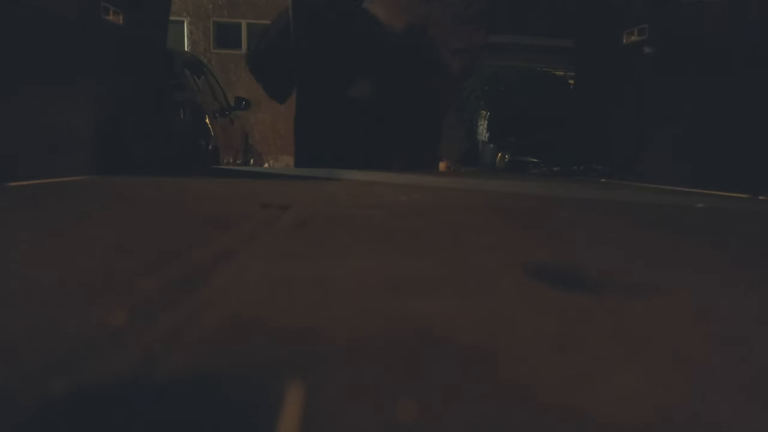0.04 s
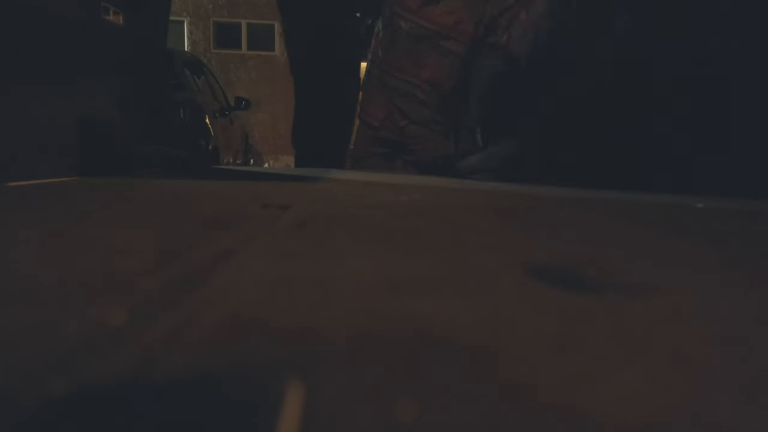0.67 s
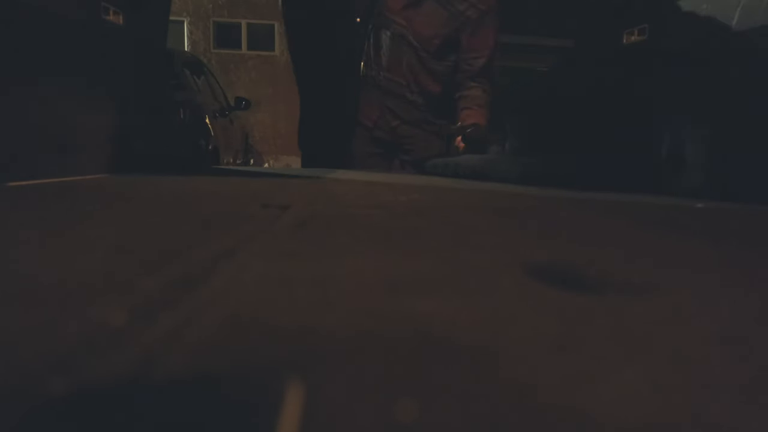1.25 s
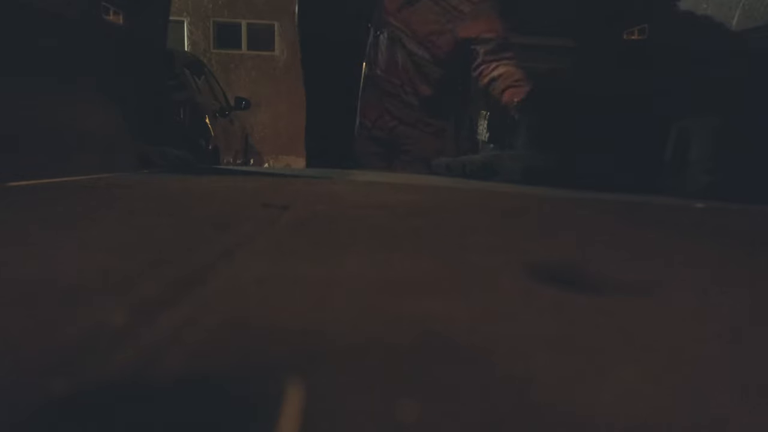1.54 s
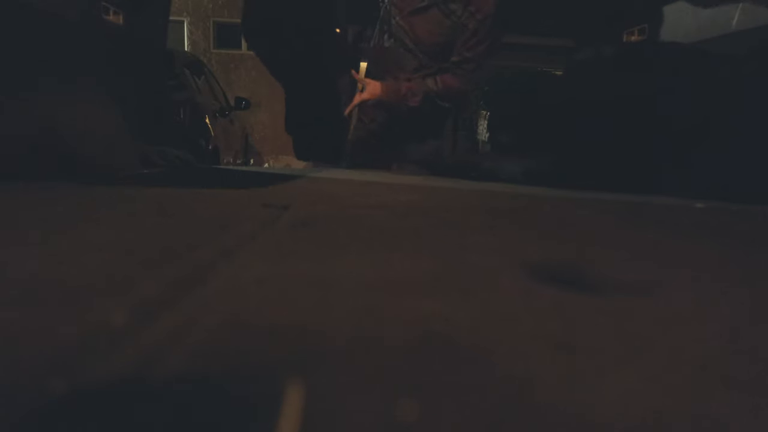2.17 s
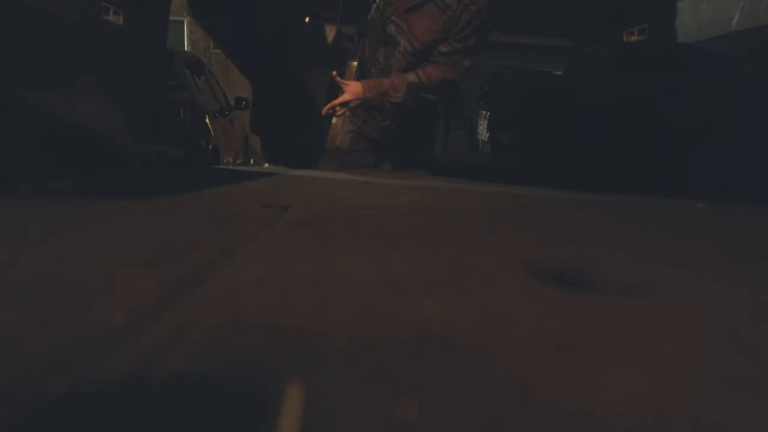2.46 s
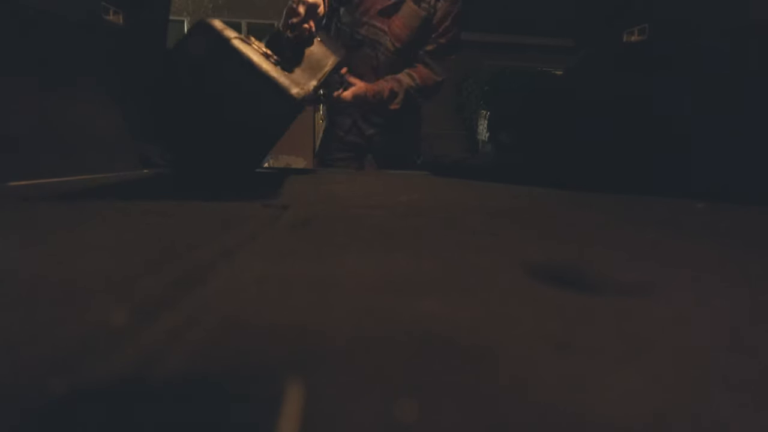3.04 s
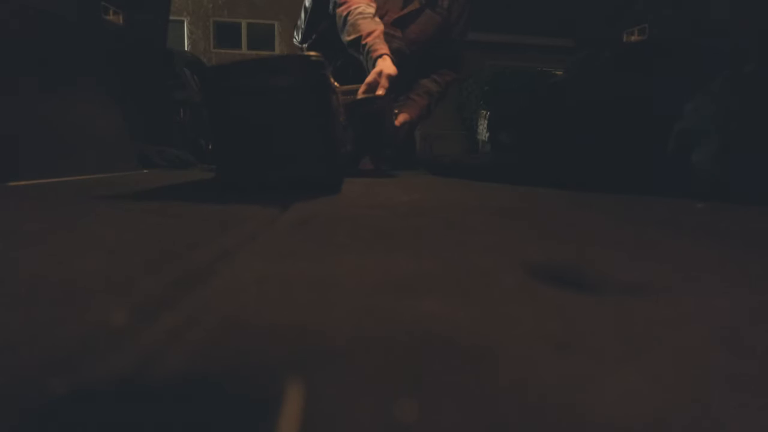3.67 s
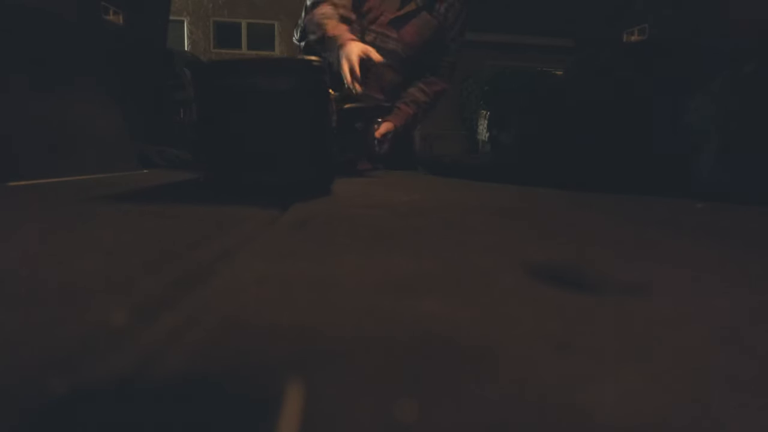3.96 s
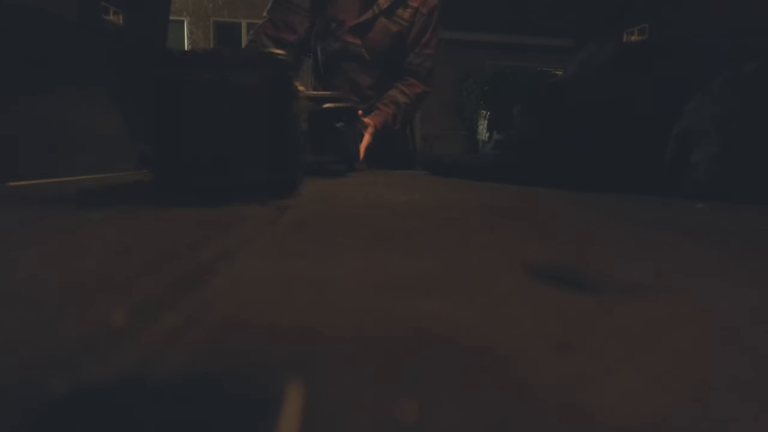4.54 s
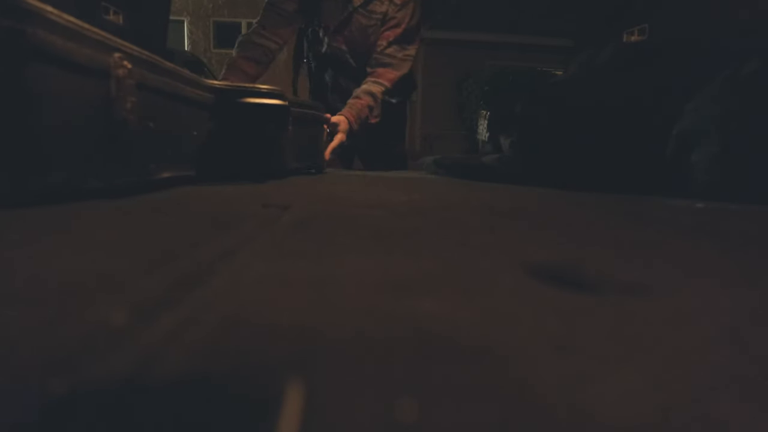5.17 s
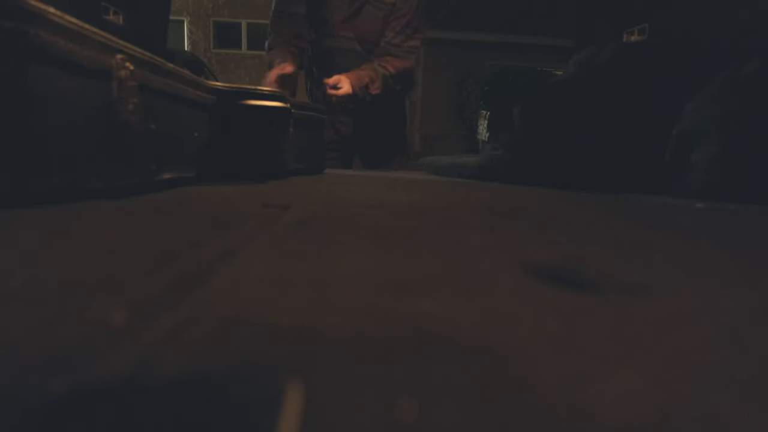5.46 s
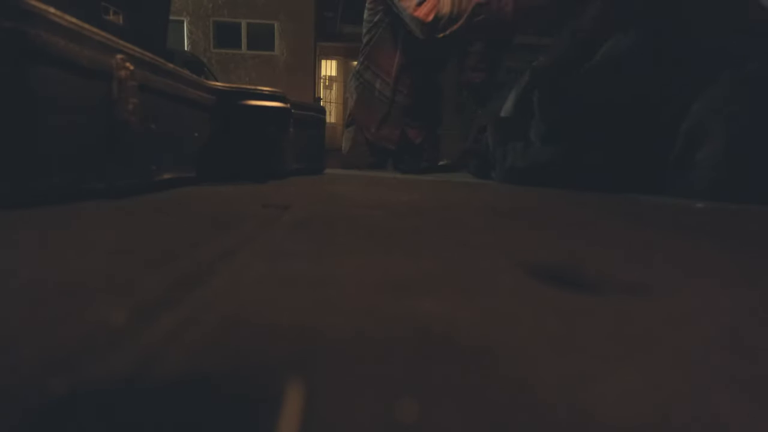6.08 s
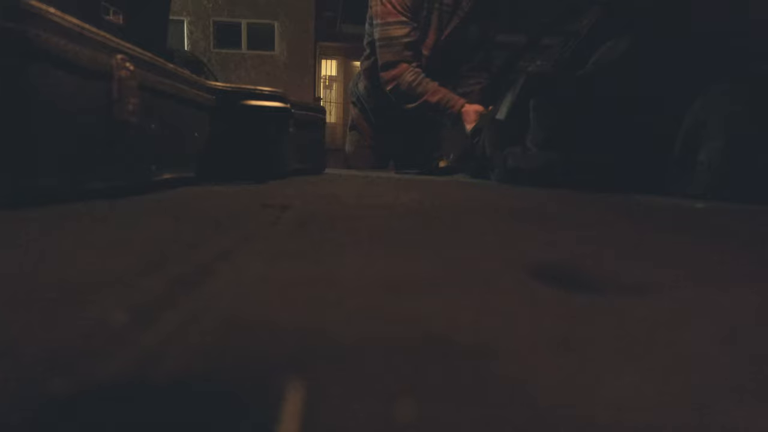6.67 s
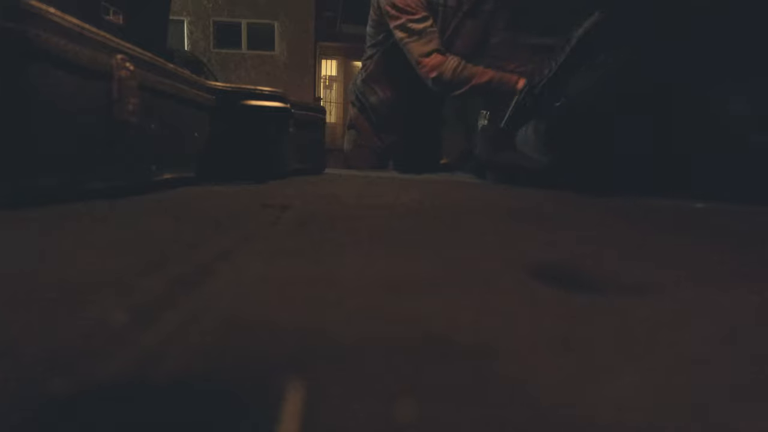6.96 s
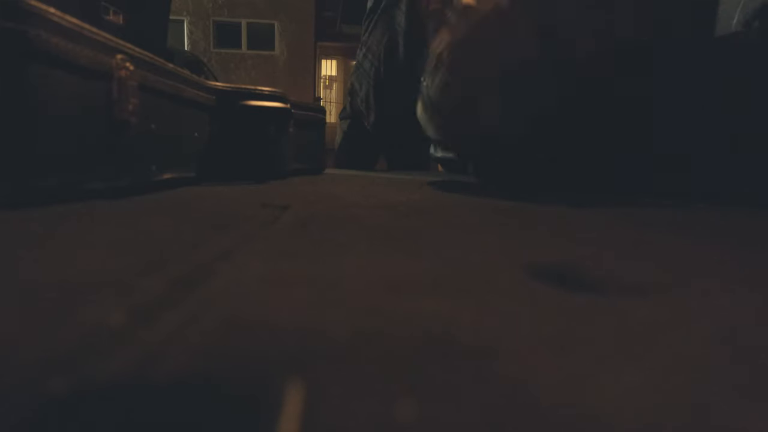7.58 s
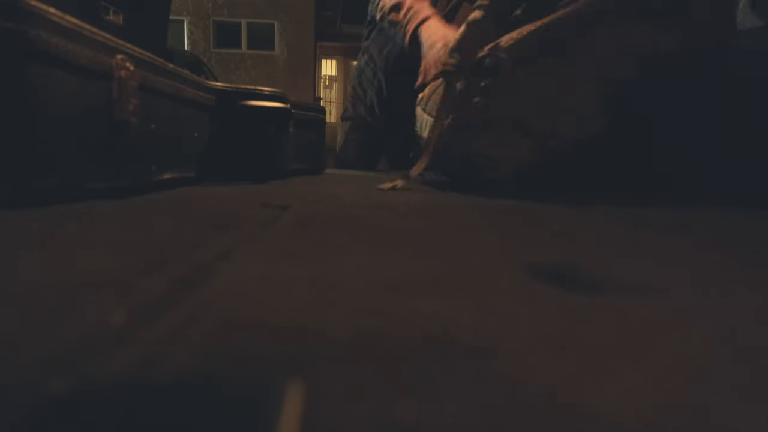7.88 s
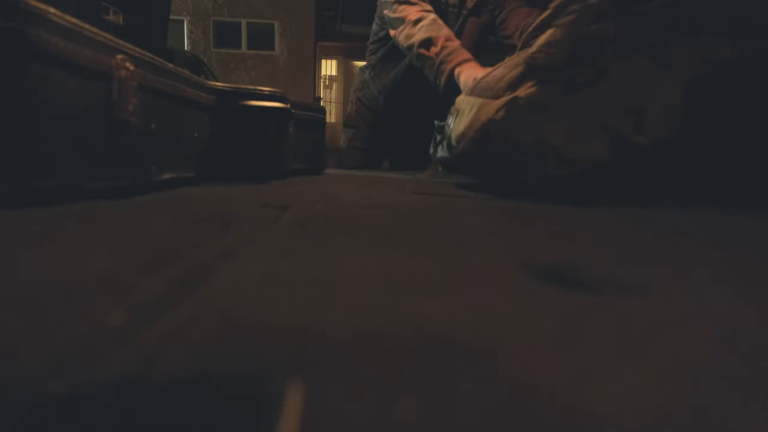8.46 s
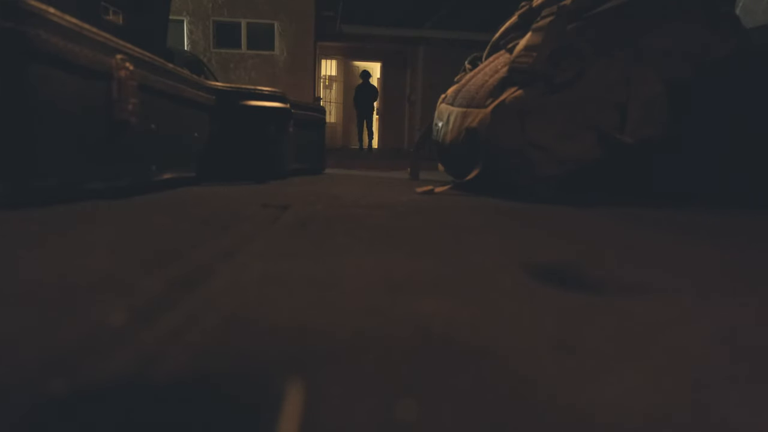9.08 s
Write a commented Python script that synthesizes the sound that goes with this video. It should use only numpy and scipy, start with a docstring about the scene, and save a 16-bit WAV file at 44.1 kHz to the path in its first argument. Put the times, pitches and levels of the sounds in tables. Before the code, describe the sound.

Fabric bags swish and scrape across a carpeted car floor while hard cases thump down, knock and rock to rest.

```python
"""Loading luggage into a car

Hard cases and fabric bags go onto the carpeted floor, heard from inside over a quiet hum.
Stick-slip friction makes nylon swish and drag. Impacts excite the damped modes of floor and shell
as a case thumps down, is pushed along and rocks to rest; straps and buckles tick.
The small padded cabin adds short reflections to the blows."""
import sys
import numpy as np
from scipy import signal
from scipy.fft import rfft, irfft, next_fast_len
from scipy.io import wavfile
from scipy.ndimage import uniform_filter1d, map_coordinates

SR = 44100
rng = np.random.default_rng(int(sys.argv[2]) if len(sys.argv) > 2 else 0)


def int16_out(signal):
    """Quantize to a 16-bit WAV file."""
    q = np.round(np.clip(np.atleast_2d(signal).T, -1, 1) * 32767)
    wavfile.write(sys.argv[1], SR, q.astype(np.int16))


N = 411011
TIME = np.arange(N) / SR
HZ = np.fft.rfftfreq(N, 1 / SR) + 1
AGE = np.arange(SR // 2) / SR  # t/s since an impact
EDGE_HZ = 15950


def amp(db):
    """Amplitude ratio: a factor of ten per 20 dB."""
    return 10 ** (np.asarray(db) / 20)


def decay(t60):
    """Exponential damping: 60 dB lost in t60 seconds."""
    return amp(-60 * AGE / t60)


def unit_rms(x):
    """Normalisation to unit mean power."""
    return x / np.sqrt(np.mean(x ** 2) + 1e-20)


def spectrum(points):
    """Gain at each of HZ, by interpolation of level against log frequency."""
    f, db = np.transpose(points)
    return amp(np.interp(np.log(HZ), np.log(f + 1), db))


def colour(x, gain):
    """Zero-phase filtering: multiplication in the frequency domain."""
    count = x.shape[-1]
    size = next_fast_len(count)
    gain = np.interp(np.fft.rfftfreq(size), np.fft.rfftfreq(count), gain)
    return irfft(rfft(x, size) * gain, size)[..., :count]


def band(x, hz, octaves):
    """Band-pass filtering by a Gaussian on the octave scale, to rms 1."""
    f = np.fft.rfftfreq(len(x), 1 / SR) + 1
    bell = np.exp(-(np.log2(f / hz) / octaves) ** 2 / 4)
    return unit_rms(colour(x, bell / np.sqrt(f + 200) * (f < EDGE_HZ)))


def wander(hz):
    """Random modulation: low-pass noise at rms 1."""
    t = TIME[::64]
    lowpass = 1 / (1 + (np.fft.rfftfreq(len(t), t[1]) / hz) ** 4)
    return np.interp(TIME, t, unit_rms(colour(rng.standard_normal(len(t)), lowpass)))


def diffuse(count, apart_hz=1600):
    """Diffuse field: left and right are coherent in the bass, incoherent in the treble."""
    mid, side = rng.standard_normal((2, count))
    angle = np.pi / 4 * np.tanh((np.fft.rfftfreq(count, 1 / SR) / apart_hz) ** 2)
    mid, side = colour(mid, np.cos(angle)), colour(side, np.sin(angle))
    return np.array([mid + side, mid - side])


# Spectrum of the outside air: (f/Hz, relative level/dB)
AIR_SPECTRUM = [(18, -61), (30, -35), (64, -11), (188, -19), (520, -16), (931, -21), (1210, -25),
                (15800, -47)]

def hum(level_db=-62.5):
    """Stationary ambient noise: the night air outside the open car."""
    return amp(level_db) * unit_rms(colour(diffuse(N), spectrum(AIR_SPECTRUM)))


def cabin(x, wet_db=-8, t60=0.14, low_cut_hz=500):
    """Reverberation: absorption in the upholstery soon ends the reflections off the close walls."""
    tail = diffuse(len(AGE)) * decay(t60) * np.minimum(AGE / 0.0028, 1)
    wet = signal.fftconvolve(x[None], tail / np.linalg.norm(tail[0]), axes=1)[:, :N]
    return amp(wet_db) * colour(wet, HZ / np.hypot(HZ, low_cut_hz))


# Path of the luggage: (t/s, side from -1 left to 1 right)
LUGGAGE_PATH = [(.3, -0.034), (.55, 0.85), (1.9, 0.81), (2.3, -0.38), (5.4, -0.66), (5.75, 0.82)]

def localise(x, lag_s=0.00004, mono_hz=450):
    """Arrival-time difference: the nearer side leads; the bass is common to both."""
    lag = lag_s * SR * np.interp(TIME, *np.transpose(LUGGAGE_PATH))
    bass = colour(x, 1 / (1 + (HZ / mono_hz) ** 4))
    treble = [map_coordinates(x - bass, [np.arange(N) - side * lag], order=3) for side in (1, -1)]
    return bass + np.array(treble)


def grit(count, per_s=2500, spread_db=3, smooth=1.53):
    """Stick-slip: threads catch and release in unequal impulses over smooth friction noise."""
    size = amp(spread_db * np.minimum(rng.exponential(1, count), 5))
    slips = size * rng.choice([-1, 1], count) * (rng.random(count) < per_s / SR)
    return unit_rms(unit_rms(slips) + smooth * rng.standard_normal(count))


# Spectrum of rubbed fabric: (f/Hz, relative level/dB)
FABRIC_SPECTRUM = [(40, -15), (90, -3), (150, 4), (210, -5.5), (310, 4), (600, -2), (800, -8.5),
                   (1900, -8.5), (4100, -15), (8500, -19.5), (13500, -19.8), (15800, -20.5)]

def cloth(slips, tilt=1):
    """Source and filter: the fabric shapes the spectrum of its slips."""
    return colour(slips, spectrum(FABRIC_SPECTRUM) * tilt)


# The arms hold still: (start t/s, end t/s)
ARM_RESTS = [(5.36, 5.65), (8.9, 10)]

def jacket(level_db=-70, thin_hz=4500, unrest_db=2.6):
    """Light friction: sleeves crinkle faintly while the arms move."""
    crinkles = cloth(grit(N, per_s=320, spread_db=-0.5, smooth=1.5), HZ / np.hypot(HZ, thin_hz))
    resting = np.any([(TIME > start) & (TIME < end) for start, end in ARM_RESTS], axis=0)
    moving = uniform_filter1d(1. - resting, size=SR // 10)
    return unit_rms(crinkles) * amp(level_db + unrest_db * wander(9)) * moving


# A bag or sleeve speeds up and slows: (peak t/s, rise/s, fall/s, rasp level/dB, hiss re rasp/dB)
BAG_SLIDES = [(.19, 0.83, .25, -46.5, 4), (.52, 0.18, 0.12, -50.5, 1.5), (.76, 0.45, 0.29, -46, -1.5),
              (1.72, 0.12, 0.18, -60, 3), (2.1, .22, 0.26, -65.5, 0), (3.08, 0.61, 0.16, -57, -5),
              (3.93, 0.46, 0.26, -53, -4), (4.62, 0.31, 0.34, -51, -2.5), (5.07, 0.13, 0.096, -44.5, -6.5),
              (5.292, 0.087, 0.051, -48.5, -6), (6.545, .05, 0.033, -56.5, -3),
              (6.87, 0.24, 0.27, -46, 0.5), (7.654, .1, 0.24, -39.5, -1), (7.95, 0.21, 0.27, -48.5, -1),
              (8.39, 0.29, 0.21, -45.5, -1), (8.68, 0.37, 0.2, -52, -0.5)]
# A tug breaks the grip, pulls, lets go: (start t/s, hold/s, fall/s, rasp level/dB, hiss re rasp/dB)
BAG_TUGS = [(1.231, 0.21, 0.24, -53.5, 1.5), (3.241, 0.019, 0.21, -55.5, -2),
            (4.325, 0.035, 0.21, -53, -23), (4.715, 0.24, 0.14, -49, -1), (5.749, 0.16, 0.37, -48.5, -2),
            (7.059, .01, 0.052, -52, -13), (7.16, 0.23, .2, -53.5, 0), (7.405, 0.11, 0.067, -48.5, 3.5)]

def strokes(grab_s=0.012, fade_db=16, bend=1.48):
    """Incoherent sources add in power: rasp and hiss envelopes of all slides and tugs, in dB."""
    t = TIME[::64]
    moves = []
    for s, rise, fall, db, hiss_db in BAG_SLIDES:
        away = np.maximum((s - t) / rise, (t - s) / fall)
        moves.append((amp(db - fade_db * away ** bend), hiss_db))
    for s, hold, fall, db, hiss_db in BAG_TUGS:
        onset = np.clip((t - s) / grab_s, 0, 1)
        away = np.maximum(t - s - hold, 0) / fall
        moves.append((onset * amp(db - fade_db * away ** bend), hiss_db))
    rasp = sum(gain ** 2 for gain, _ in moves)
    hiss = sum((gain * amp(hiss_db)) ** 2 for gain, hiss_db in moves)
    return [np.interp(TIME, t, 10 * np.log10(power + 1e-12)) for power in (rasp, hiss)]


def creases(per_s=40, t60=0.035, lowest_hz=420, over_rasp_db=6.5):
    """Buckling: stiff moving cloth gives separate crinkles, from bumps to snaps over four octaves."""
    out, envelope = np.zeros(N), decay(t60)[:SR // 20]
    for when, pitch, size in rng.random((round(per_s * N / SR), 3)):
        crinkle = band(grit(len(envelope)), lowest_hz * 2 ** (4 * pitch), 0.5) * envelope
        add(out, when * N / SR, size ** 2 * crinkle)
    rasp, _ = strokes()
    return out * amp(over_rasp_db + rasp)


def add(mix, s, sound):
    """Superposition of a sound starting at s seconds."""
    part = mix[max(round(s * SR), 0):][:len(sound)]
    part += sound[:len(part)]


def folds(per_s=14, fade_s=0.051):
    """Relaxation: folds give way at random in surges that fade exponentially, at rms 1."""
    starts = (rng.random(N) < per_s / SR) * rng.uniform(0.3, 1, N)
    return unit_rms(signal.lfilter([1], [1, -np.exp(-1 / (fade_s * SR))], starts))


def flexing(x, depth_db=2.5):
    """Time-varying resonance: narrow peaks come and go as the cloth changes shape."""
    frames = signal.stft(x, nperseg=1024)[2]
    patches = uniform_filter1d(rng.standard_normal(frames.shape), size=6, axis=0)
    patches = uniform_filter1d(patches, size=4, axis=1)
    return signal.istft(frames * amp(depth_db * unit_rms(patches)))[1][:N]


def dragging(stick_db=-76, judder_db=1, lumps_db=2, crumple=0.27):
    """Sliding friction with uneven grip: the floor rumbles, the weave rasps, the surface hisses."""
    rasp, hiss = strokes()
    weight = rasp - hiss  # a dull stroke has weight on it, which shakes the floor
    rumble = -23 + 0.67 * rasp + 0.59 * weight + lumps_db * wander(26)
    slips = cloth(flexing(grit(N)))
    low, high = 1 / (1 + (HZ / 650) ** 6), 1 / (1 + (3500 / HZ) ** 6)
    surge = crumple * folds()
    layers = (low, rumble, surge), (1 - low - high, rasp - 1, surge), (high, hiss - 1, surge / 2)
    out = np.zeros(N)
    for share, db, swell in layers:
        sliding = np.maximum(amp(db) - amp(stick_db), 0)  # static friction holds the gentlest pull
        out += unit_rms(colour(slips, share)) * sliding * (1 + swell)
    return out * amp(judder_db * wander(32))


# Short pushes of a bag or case: (peak t/s, level/dB, half length/s, centre f/Hz, width/octaves)
PUSHES = [(0.663, -47, 0.029, 1620, 0.09), (0.734, -38, 0.0066, 1210, 1.1), (1.28, -61, 0.08, 150, 0.5),
          (2.464, -37.5, 0.0057, 600, 1.2), (3.659, -50.5, 0.11, 338, 0.65),
          (5.083, -35.5, 0.013, 950, 0.75), (6.01, -45, 0.035, 280, 1.2), (7.693, -36.5, 0.027, 260, 1.1),
          (8.385, -41, 0.08, 1050, 1)]

def shoves():
    """Transient friction: a quick push makes a noise band swell and die in a Gaussian envelope."""
    out, t = np.zeros(N), AGE - AGE[-1] / 2
    for s, db, half, hz, octaves in PUSHES:
        swell = np.exp(-(t / half) ** 2 / 2)
        add(out, s + t[0], amp(db) * swell * band(grit(len(t)), hz, octaves))
    return out


# Nylon ribs sliding ever faster: (t/s, f/Hz, level/dB)
RIB_GLIDE = [(0.135, 3200, -49), (0.25, 4700, -45), (.308, 6450, -39.5), (.341, 6850, -37.5),
             (.365, 6900, -62)]

def nylon(width_hz=310, octave_db=-3, pair_db=-11):
    """Periodic excitation: passing ribs whistle, higher and purer as their speed rises."""
    s, hz, db = np.transpose(RIB_GLIDE)
    rate = np.interp(TIME, s, hz)
    width = width_hz * (hz.max() / rate) ** 2
    jitter = np.sqrt(2 * np.pi * width / SR) * rng.standard_normal(N)
    phase = np.cumsum(2 * np.pi * rate / SR + jitter)
    # ribs alternate strong and weak, which adds a line between the whistle and its octave
    whistle = np.cos(phase) + amp(octave_db) * np.cos(2 * phase) + amp(pair_db) * np.cos(1.5 * phase)
    return unit_rms(whistle) * amp(np.interp(TIME, s, db)) * (TIME > s[0]) * (TIME < s[-1])


# Resonances of ribbed webbing: (f/Hz, width before broadening/Hz, relative level/dB)
WEBBING_PEAKS = [(2290, 75, -2), (3300, 71, 4.5), (3850, 280, -2), (4870, 39, -0.5), (6600, 160, -12)]

def swipe(start_s=6.869, length_s=0.077, level_db=-26, fizz_db=-19, broaden=4.1, low_hz=1700):
    """Forced resonance: coarse slips excite webbing as it is whipped across an edge."""
    out, t = np.zeros(N), np.arange(0, length_s, 1 / SR)
    f = np.fft.rfftfreq(len(t), 1 / SR)
    peaks = sum(amp(db) ** 2 / (1 + (2 * (f - hz) / (broaden * width)) ** 2)
                for hz, width, db in WEBBING_PEAKS)
    response = np.sqrt(amp(fizz_db) ** 2 + peaks)
    radiation = f ** 2 / (f ** 2 + low_hz ** 2)  # a narrow strap radiates no bass
    speed = np.sin(np.pi * (t / length_s) ** 0.8) ** 1.24
    rasp = colour(grit(len(t), per_s=3900, smooth=1.8), response * radiation)
    add(out, start_s, amp(level_db) * speed * unit_rms(rasp))
    return out


# Dead slaps of straps and shell edges: (t/s, level/dB, centre f/Hz)
SLAPS = [(1.243, -41.5, 5030), (1.32, -44, 7000), (2.470, -24, 2600), (2.588, -49, 6500),
         (2.758, -29.5, 2780), (2.963, -28, 940), (2.984, -33, 3900), (3.177, -51, 3500),
         (3.397, -47, 3070), (4.35, -39.5, 2000), (4.382, -32.5, 4200), (5.013, -29.5, 4200),
         (5.082, -30.5, 6000), (5.273, -37.5, 4000), (5.365, -37.5, 2200), (6.006, -28, 4000),
         (5.689, -52, 4000), (6.295, -43.5, 6000), (7.162, -42, 2190)]

def ticks(t60=0.038, rise_s=0.0022, tail_db=-12, tail_t60=0.085, octaves=1.4):
    """Heavily damped contact: a broadband snap with a short crackly tail."""
    out = np.zeros(N)
    envelope = (1 - np.exp(-AGE / rise_s)) * (decay(t60) + amp(tail_db) * decay(tail_t60))
    for s, db, hz in SLAPS:
        add(out, s, amp(db) * envelope * band(grit(len(AGE)), hz, octaves))
    return out


def rustling():
    """Superposition of all fabric and strap sounds, with independent noise at each call."""
    return dragging() + creases() + shoves() + nylon() + swipe() + ticks() + jacket()


# Buckles hit a case: (t/s, relative level/dB, f/Hz)
BUCKLE_HITS = [(2.759, -30, 3450), (8.031, -30.5, 1825), (8.135, -34, 1980), (8.181, -34.5, 2180),
               (8.861, -39.5, 2370), (8.904, -42, 1890), (9.068, -47, 3220)]

def buckles(clack_t60=0.045, click_db=-6, click_t60=0.05, click_hz=4800):
    """Impact on damped plastic: a hard click and a dry clack from one broad resonance."""
    out = np.zeros(N)
    for s, db, hz in BUCKLE_HITS:
        clack = decay(clack_t60) * band(grit(len(AGE)), hz, octaves=0.16)
        click = amp(click_db) * decay(click_t60) * band(grit(len(AGE)), click_hz, octaves=1.15)
        add(out, s, amp(db) * (clack + click) / 2)
    return out


def strike(modes, hardness_hz, clatter_db, clatter_t60, pitch=1, order=2):
    """Modal response with dense clatter, at peak 1: a soft contact acts as a low-pass filter."""
    ring = sum((-1) ** k * amp(db) * decay(t60) * np.sin(2 * np.pi * hz * pitch * AGE)
               for k, (hz, db, t60) in enumerate(modes))
    lowest_hz, middle_hz = modes[0][0] * pitch, modes[len(modes) // 2][0] * pitch
    clatter = band(rng.standard_normal(len(AGE)), middle_hz, 1) * decay(clatter_t60)
    blow = ring / abs(ring).max() + amp(clatter_db) * clatter
    blow = signal.sosfilt(signal.butter(order, hardness_hz, fs=SR, output="sos"), blow)
    # a panel radiates little below its lowest mode
    blow = signal.sosfilt(signal.butter(2, lowest_hz / 2, "high", fs=SR, output="sos"), blow)
    return blow / abs(blow).max()


# Modes of the load floor: (f/Hz, relative level/dB, t60/s)
FLOOR_MODES = [(76, 2, 0.074), (93.5, 1, 0.099), (135, -14, 0.26), (148, -1.5, 0.092), (283.3, -0.5, 0.13),
               (359, 3.5, 0.058), (449, -0.5, 0.063)]
# Weight lands on the floor: (t/s, peak level/dB, contact cutoff f/Hz)
LANDINGS = [(0.427, -38, 353), (0.853, -34.5, 403), (1.797, -47, 300), (2.469, -17.5, 597),
            (2.758, -30, 420), (2.957, -11.5, 200), (3.063, -36, 80), (4.348, -39, 298),
            (5.272, -29.5, 110), (6.221, -39, 300), (7.672, -32, 111)]

def thumps(sway_hz=41, sway_db=-32, sway_t60=0.97):
    """Structure-borne sound: the struck floor booms and the car body shudders on after it."""
    out = np.zeros(N)
    envelope = amp(sway_db) * decay(sway_t60) * np.minimum(AGE / 0.0074, 1)
    for s, db, hardness_hz in LANDINGS:
        sway = band(rng.standard_normal(len(AGE)), sway_hz, 0.82) * envelope
        boom = strike(FLOOR_MODES, hardness_hz, clatter_db=-18, clatter_t60=0.16)
        add(out, s, amp(db) * (boom + sway))
    return out


def rocking(start_s=5.366, gap_s=0.038, slowing=1.47, pitch=0.98, count=4):
    """Dissipation: a case rocks to rest in ever weaker, softer contacts; rows as in CASE_KNOCKS."""
    k = np.arange(count)
    s = start_s + gap_s * (slowing ** k - 1) / (slowing - 1)
    db = -21 - 2.2 * k ** 2
    hardness_hz = 1350 / (k + 1) ** 0.62
    return list(zip(s, db, hardness_hz, [pitch] * count))


# Modes of a case shell: (f/Hz at pitch factor 1, relative level/dB, t60/s)
SHELL_MODES = [(334, 0.5, 0.034), (395, 2.5, 0.03), (531, 0.5, 0.052), (836, -4.5, 0.04), (1280, -6, .033),
               (1875, -4.5, 0.026)]
# Blows on a case: (t/s, peak level/dB, contact cutoff f/Hz, pitch factor)
CASE_KNOCKS = [(0.153, -19, 520, 0.8), (0.59, -35.5, 900, 1.26), (.728, -25.5, 1900, 0.88),
               (0.815, -25.5, 320, 0.68), (2.064, -43, 200, 0.426), (2.463, -18.5, 1150, 1.1),
               (2.584, -25.5, 950, 1.1), (2.752, -28, 1200, 1.24), (3.461, -42, 410, 0.55),
               (4.352, -31, 900, 0.976), (5.266, -23, 760, 1.03), (6.005, -30, 680, 0.65),
               (6.471, -44, 900, 1.1), (7.169, -39, 450, 0.52), (7.895, -36, 398, 0.71)]

def knocks():
    """Free vibration: a hollow case shell rings briefly after each contact."""
    out = np.zeros(N)
    for s, db, hardness_hz, pitch in CASE_KNOCKS + rocking():
        knock = strike(SHELL_MODES, hardness_hz, clatter_db=-7, clatter_t60=0.033, pitch=pitch, order=3)
        add(out, s, amp(db) * knock)
    return out


def scene(treble_coherence=0.29, spread_hz=2000):
    """Superposition in stereo: rustle, blows and their reflections over the hum."""
    rustle, blows = rustling(), knocks() + thumps() + buckles()
    left, right = localise(rustle)
    # a bag rubs at many places at once, so its treble differs between left and right
    coherence = np.clip(treble_coherence + (1 - treble_coherence) / (1 + (HZ / spread_hz) ** 4), 0, 1)
    right = colour(right, coherence) + colour(rustling(), np.sqrt(1 - coherence ** 2))
    return np.array([left, right]) + localise(blows) + cabin(blows) + hum()


def record(dry):
    """Band limiting: a steep linear-phase low-pass at EDGE_HZ."""
    lowpass = signal.firwin(511, EDGE_HZ, window=("kaiser", 9), fs=SR)
    return signal.oaconvolve(dry, lowpass[None], "same")


dry = scene()
out = record(dry)
int16_out(out)
```